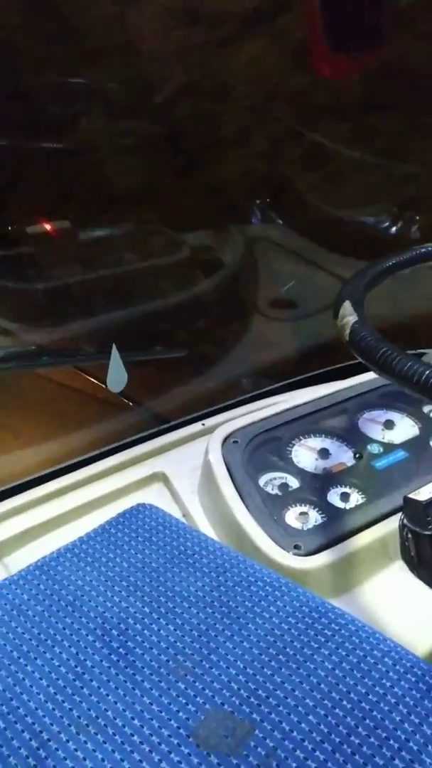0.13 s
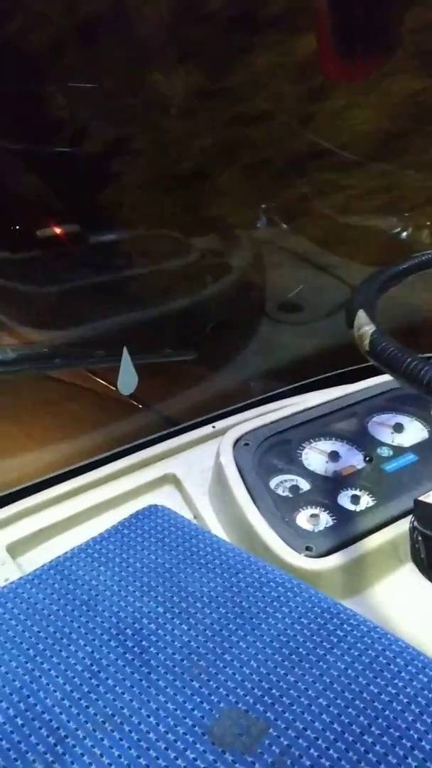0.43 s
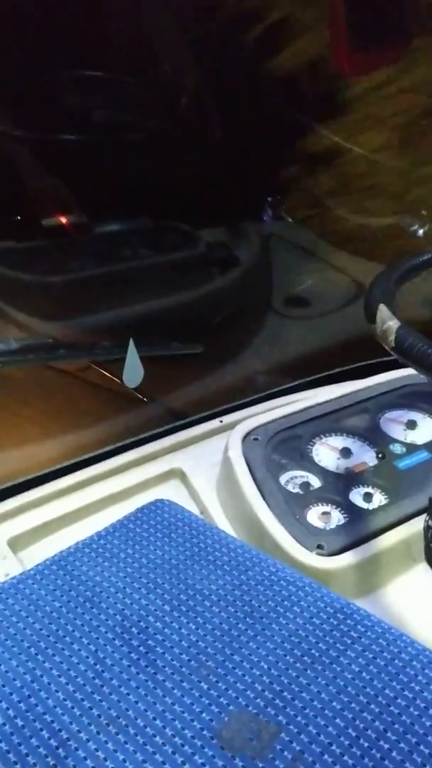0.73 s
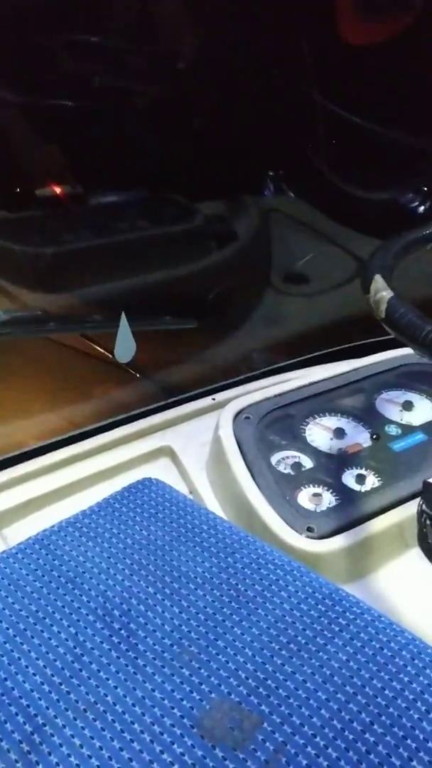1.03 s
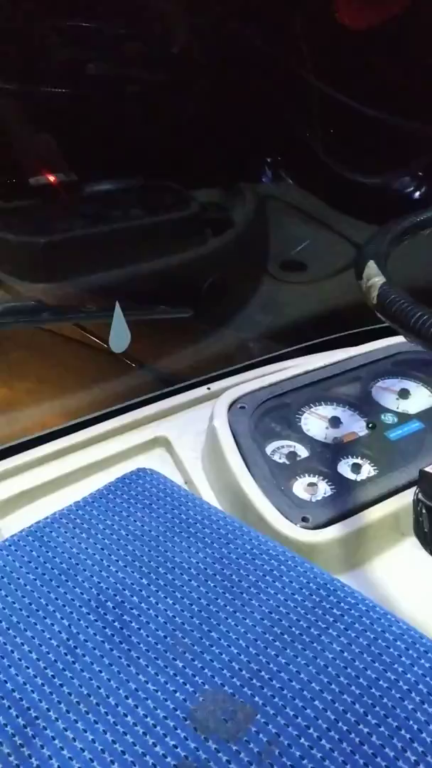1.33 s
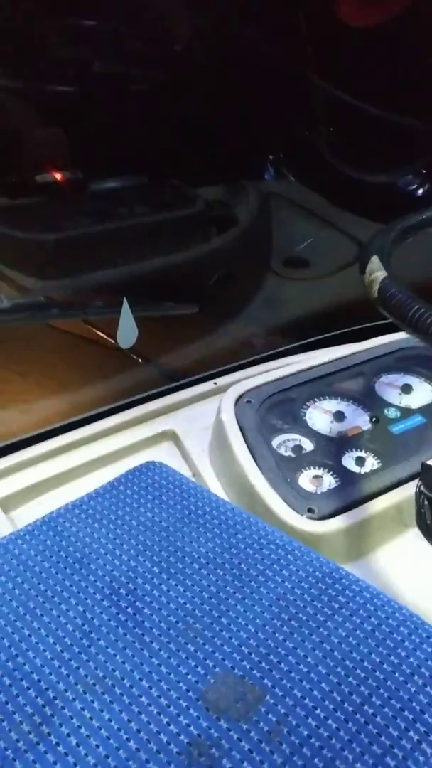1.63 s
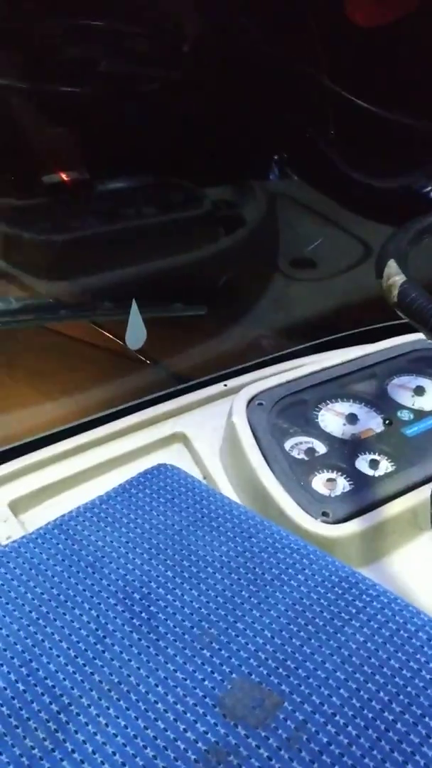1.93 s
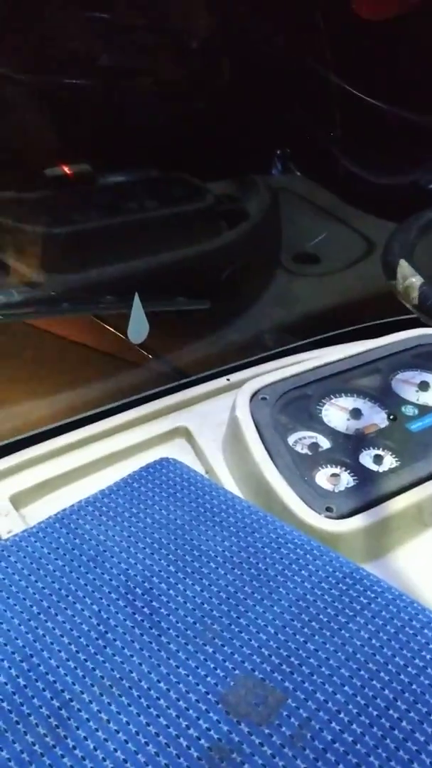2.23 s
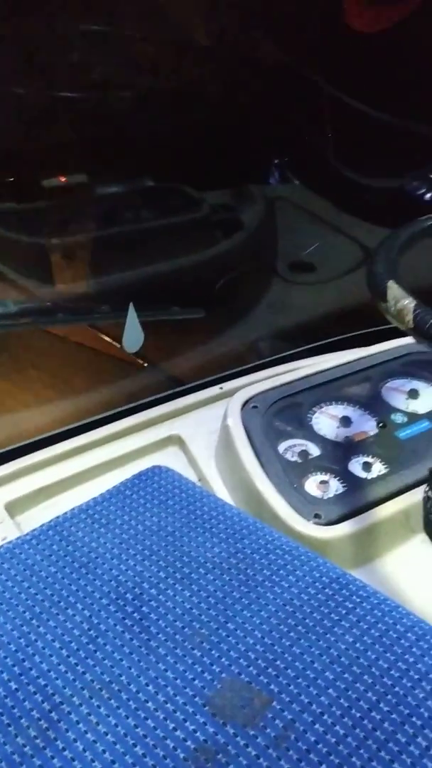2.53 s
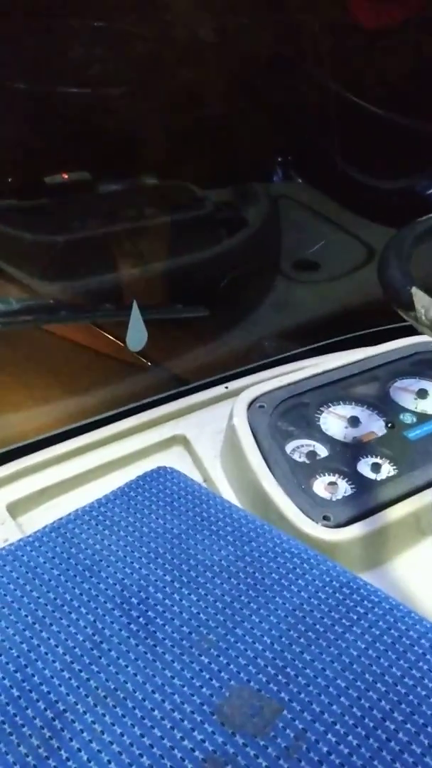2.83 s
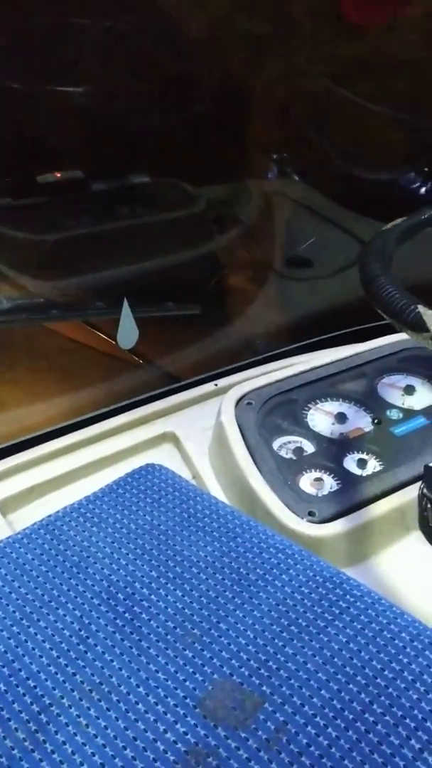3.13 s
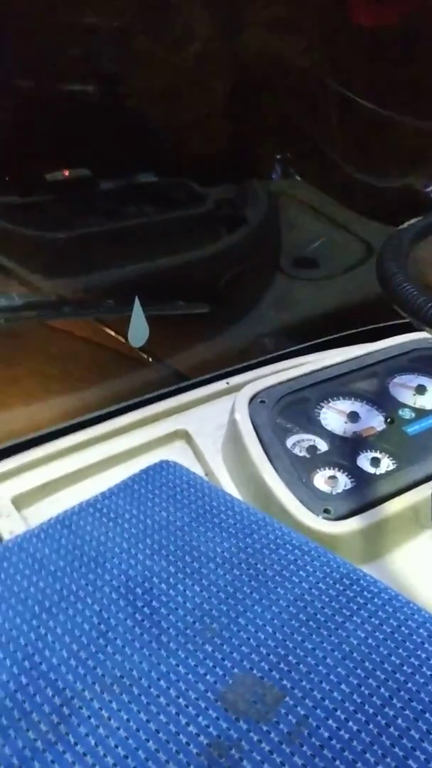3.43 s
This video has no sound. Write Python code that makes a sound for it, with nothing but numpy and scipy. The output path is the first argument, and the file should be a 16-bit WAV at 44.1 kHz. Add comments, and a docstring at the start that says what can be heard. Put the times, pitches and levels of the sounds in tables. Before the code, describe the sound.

Air horn giving a brief toot and one long blast above engine and road noise.

```python
"""Inside the cab of a large vehicle driving at night: the body booms, the road roars and air hisses past.
An air horn, a reed buzzing into a trumpet, ends a short toot and then sounds one long steady blast.
Its overtones fade in and out as the roadside echoes shift. A loose fitting rattles once over a bump.
A limiter turns the loudest moments down, so the rumble ducks under the horn and pumps with deep booms."""
import sys
import numpy as np
from scipy import signal
from scipy.fft import rfft, irfft, next_fast_len
from scipy.io import wavfile
from scipy.ndimage import uniform_filter1d, minimum_filter1d, map_coordinates

SR = 44100
rng = np.random.default_rng(int(sys.argv[2]) if len(sys.argv) > 2 else 0)


def unload_audio(sound):
    """Save the sound as a 16-bit wav file, at the path given as the first command line argument."""
    columns = np.transpose(np.atleast_2d(sound))
    # keep every value between -1 and 1, then stretch to whole-number steps
    steps = np.round(np.clip(columns, -1, 1) * 32767)
    wavfile.write(sys.argv[1], SR, steps.astype(np.int16))


N = 158319
T = np.arange(N) / SR
TOP_HZ = 15800  # the highest sound in the scene


# The horn's blasts. Each row: valve opens in seconds, valve shuts in seconds, air pressure in dB.
BLASTS = [(-.011, 0.053, -1), (2.482, 3.9, -2)]

def pressure(attack_s=0.033, release_s=0.025):
    """Air pressure at the reed swells when the valve opens and bleeds away when it shuts."""
    rise = lambda start: 1 - np.exp(-(np.maximum(T - start, 0) / attack_s) ** 2)
    fall = lambda stop: np.exp(-np.maximum(T - stop, 0) / release_s)
    return sum(amp(db) * rise(start) * fall(stop) for start, stop, db in BLASTS)


# The horn's strong partials, the pure tones that make up its note. Each row: multiple of the pitch,
# left level in dB, right level in dB, how far the left ear's wave is ahead in radians.
HORN_PARTIALS = [(1, -16, -14, 0.5), (2, -16, -15.5, 0.34), (3, -13.5, -15, 0.5), (4, -22.5, -27, -2.5),
                 (5, -18.5, -23, -2.0), (6, -26.5, -32, 1.14), (7, -23.5, -26, 0), (8, -35.5, -23.5, 1.5),
                 (9, -37, -35, -1.1), (10, -38, -32.5, 1.5), (11, -35.5, -31.5, 3.5), (12, -40, -42, 3),
                 (13, -31, -33.5, -2.5), (14, -34, -43, -1.5), (15, -42.5, -41, -1), (16, -48, -32, 1.3)]
# The buzz above those. Each row: frequency in Hz, level of each partial there in dB.
HORN_BUZZ = [(5800, -40), (7500, -40.5), (9500, -40), (12000, -42.5), (14000, -43.5), (15500, -45)]
# How much of the horn arrives as roadside echoes. Each row: frequency in Hz, share from 0 to 1.
ECHO_SHARE = [(344, 0.01), (1000, 0), (1400, 0.09), (1750, 0.12), (2400, 0.16), (3000, 0.59), (9000, 0.88)]
# Air escaping from the horn. Each row: frequency in Hz, level in dB.
ESCAPING_AIR = [(150, -23), (400, 2), (850, -32), (1300, -1), (1800, 4.5), (3000, -2.5), (4500, -11),
                (6500, -5), (9000, -6.5), (12000, -25), (16000, -35)]

def horn(pitch_hz=343.85, gain_db=19.5):
    """A reed locked to its trumpet makes a stack of partials, heard both directly and as echoes."""
    jitter = .00015  # the reed's unsteadiness, as a share of its pitch
    brassy = 1.25  # how much faster the overtones grow with pressure
    dispersion_rad = .4  # the trumpet delays the high partials
    blow = pressure()
    phase = 2 * np.pi * np.cumsum(pitch_hz * (1 + jitter * wobble(230))) / SR
    drift = lambda per_s: unit(wobble(per_s) + 1j * wobble(per_s))  # wanders in level and phase
    note = np.zeros((2, N))
    for k in range(1, int(TOP_HZ / pitch_hz) + 1):
        hz = k * pitch_hz
        if k <= len(HORN_PARTIALS):
            _, left_db, right_db, lead = HORN_PARTIALS[k - 1]
        else:
            left_db = right_db = along(HORN_BUZZ, hz)
            lead = rng.uniform(-np.pi, np.pi)
        share = np.clip(along(ECHO_SHARE, hz), 0, 1)
        strength = np.sqrt(2) * blow ** (1 + brassy * (1 - 1 / k))
        tone = strength * np.exp(1j * (k * phase - dispersion_rad * k * k))
        flutter_depth = .15 * hz / 1000  # higher echoes flutter more
        for ear, (db, turn) in enumerate([(left_db, lead / 2), (right_db, -lead / 2)]):
            direct = np.sqrt(1 - share) * np.exp(1j * turn)
            echoes = np.sqrt(share) * unit(drift(per_s=3.498) + flutter_depth * drift(per_s=30))
            note[ear] += amp(db) * np.real(tone * (direct + echoes))
    air = amp(-36) * blow * rush(ESCAPING_AIR, patchy_db=0.5)
    return amp(gain_db) * (note + air)


def first_puff(pitch_hz=380.5, peak_s=0.021, gain_db=-6):
    """Each blast's first puff rings the trumpet a little above the reed's pitch: a short blat."""
    ages = [np.maximum(T - start, 0) for start, _, _ in BLASTS]
    swell = lambda age: (age / peak_s) ** 2 * np.exp(2 * (1 - age / peak_s))
    return amp(gain_db) * sum(swell(age) * np.sin(2 * np.pi * pitch_hz * age) for age in ages)


# How long the cab rings. Each row: frequency in Hz, seconds to die away by 60 dB.
CAB_RING = [(350, 0.38), (1000, 0.24), (3000, 0.42), (12000, 0.13)]

def cab_ring(sound, gain_db=-17):
    """Sound bounces around the cab and rings on briefly."""
    hz, t, noise = signal.stft(rng.standard_normal((2, SR // 2)), SR, nperseg=256)
    ring_s = along(CAB_RING, hz)[:, None]
    dying = noise * amp(-60 * t / ring_s)
    tail = signal.istft(dying / np.sqrt(ring_s), SR)[1]  # a longer ring carries no extra energy
    return amp(gain_db) * signal.fftconvolve(sound, tail / np.linalg.norm(tail[0]), axes=1)[:, :N]


# The body's slow shudder. Each row: time in seconds, level in dB.
BODY_SHUDDER = [(.15, -15), (.65, -14), (.95, -21), (1.38, -10), (1.52, -19.5), (2.2, -9), (2.44, -15),
                (2.7, -23)]
# The boom of the engine and cab. Each row: time in seconds, pitch in Hz, level in dB.
ENGINE_BOOM = [(0.15, 53.9, -15), (0.28, 54.74, -13), (0.68, 54.23, -18), (0.97, 42.27, -9),
               (1.37, 42.08, -12.5), (1.55, 54.52, -22.5), (2.15, 54.8, -18), (2.33, 43.4, -36.5),
               (2.42, 45.4, -22), (2.46, 46, -25)]

def rumble(shudder_hz=20.87, shudder_gain_db=1.5, boom_gain_db=-2):
    """The body shudders and the engine and cab boom, the same in both ears."""
    shudder_db, = curves(BODY_SHUDDER)
    boom_hz, boom_db = curves(ENGINE_BOOM)
    shudder = amp(shudder_db + shudder_gain_db) * throb(shudder_hz, wander=0.096, swing_db=4)
    boom = amp(boom_db + boom_gain_db) * throb(boom_hz, wander=0.0653, swing_db=1.5)
    return shudder + boom


# Road noise as the drive goes on. Each row: time in seconds, roar level in dB, hiss level in dB.
ROAD_LEVELS = [(0.2, -22.5, -32.5), (0.82, -23, -34.5), (0.92, -22, -32.5), (1.13, -27.5, -39.5),
               (1.15, -23.5, -34.5), (1.27, -26, -37), (1.74, -22.5, -32.5), (2.03, -24, -35),
               (2.44, -23.5, -33.5)]
# The tone of the tyres' roar and of the air's hiss. Each row: frequency in Hz, level in dB.
TYRE_ROAR = [(12, -14), (30, 6), (60, 4.5), (80, 0), (100, -3.5), (125, -0.5), (155, 0), (185, -8),
             (222, -2.5), (290, -9.5), (420, -8.5), (700, -15), (1100, -20.5), (2000, -36)]
WINDOW_HISS = [(300, -20), (800, 1), (1300, 1.5), (1800, 2), (2700, 0), (3500, -6), (4400, -3),
               (6200, -7.5), (9200, -7.5), (12500, -11.5), (15500, -21.5)]

def road(gain_db=6.5):
    """Tyres roar through the floor and air hisses along the windows."""
    roar_db, hiss_db = curves(ROAD_LEVELS)
    roar = amp(roar_db + gain_db) * rush(TYRE_ROAR, patchy_db=.8)
    hiss = amp(hiss_db + gain_db + 0.75 * wobble(24.05)) * rush(WINDOW_HISS, patchy_db=1.6)
    return roar + hiss


# The tone of the rattle. Each row: frequency in Hz, level in dB.
RATTLE_TONE = [(300, -11), (700, -2), (830, 11), (960, -1), (2000, 0), (4000, -11), (9000, -10),
               (15500, -14)]

def rattle(at_s=1.755, half_length_s=0.027, level_db=-23.5):
    """A loose fitting chatters over a bump, with a faint squeak in it."""
    swell = np.exp(-((T - at_s) / half_length_s) ** 2)
    return swell * amp(level_db + 2 * wobble(160)) * rush(RATTLE_TONE, patchy_db=0)


# How alike noise is in the two ears. Each row: frequency in Hz, likeness (1 the same, 0 unrelated).
EAR_LIKENESS = [(60, 0.92), (130, 0.94), (290, 0.91), (640, 0.43), (1410, -0.11), (3100, 0.11),
                (6820, 0.065), (15000, 0.058)]

def rush(spectrum, patchy_db):
    """Stereo rushing noise with the given tone, in randomly louder and softer patches."""
    noise = signal.stft(rng.standard_normal((2, N)), nperseg=512)[2]
    patches = uniform_filter1d(rng.standard_normal(noise.shape[1:]), size=8, axis=0)
    patches = uniform_filter1d(patches, size=12, axis=1)
    pair = signal.istft(noise * amp(patchy_db * unit(patches)))[1][:, :N]
    width = lambda hz: np.arccos(np.clip(along(EAR_LIKENESS, hz), -1, 1)) / 2
    response = lambda hz: amp(along(spectrum, hz)) * [np.cos(width(hz)), np.sin(width(hz))]
    mid, side = filtered(pair, response)
    return unit(np.array([mid + side, mid - side]))


def throb(hz, wander, swing_db):
    """A low tone whose pitch wanders and whose level swings."""
    phase = 2 * np.pi * np.cumsum(hz * (1 + wander * wobble(19))) / SR
    return unit(np.sin(phase) * amp(swing_db * wobble(8.72)))


def amp(db):
    """Turn decibels into a gain."""
    return 10 ** (np.asarray(db) / 20)


def unit(x):
    """Scale to an average (rms) level of 1."""
    return x / np.sqrt(np.mean(np.abs(x) ** 2) + 1e-20)


def along(points, hz):
    """Read between a table's rows at any frequency, on a log scale."""
    freqs, values = np.transpose(points)
    return np.interp(np.log(hz + 1), np.log(freqs + 1), values)


def curves(rows):
    """One value per sample for each column after the time."""
    times, *columns = np.transpose(rows)
    return [np.interp(T, times, column) for column in columns]


def wobble(per_s):
    """A smooth curve through per_s random values each second."""
    coarse = T[::32]
    curve = map_coordinates(rng.standard_normal(size=4096), [coarse * per_s + 2], mode="wrap")
    return np.interp(T, coarse, curve)


def filtered(x, response):
    """Scale each frequency in x by the gain response(hz)."""
    size = next_fast_len(N + SR // 2)
    return irfft(rfft(x, size) * response(np.fft.rfftfreq(size, 1 / SR)), size)[..., :N]


def scene():
    """The horn rings in the cab, over the noise of the drive."""
    blast = horn() + first_puff()
    return blast + cab_ring(blast) + rumble() + road() + rattle()


def record(dry):
    """A fast limiter holds the peaks down and recovers steadily; everything above TOP_HZ is cut."""
    ceiling_db, hold_s, recover_db_per_s = -1, 0.0028, 136
    peak_db = 20 * np.log10(np.abs(dry).max(axis=0) + 1e-9)
    hold = int(hold_s * SR)
    duck_db = minimum_filter1d(np.minimum(ceiling_db - peak_db, 0), hold, origin=hold // 3)
    recovery_db = recover_db_per_s * T
    gain_db = np.minimum.accumulate(duck_db - recovery_db) + recovery_db
    limited = dry * amp(uniform_filter1d(gain_db, size=96))
    return filtered(limited, lambda hz: hz < TOP_HZ)


dry = scene()
out = record(dry)
unload_audio(out)
```